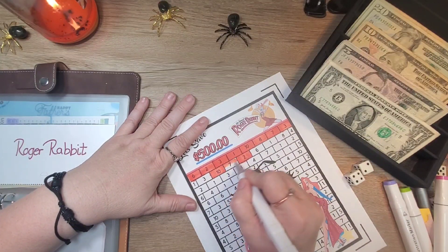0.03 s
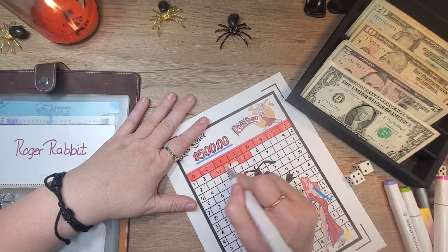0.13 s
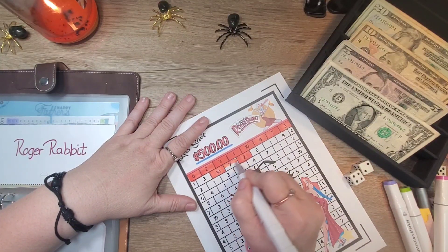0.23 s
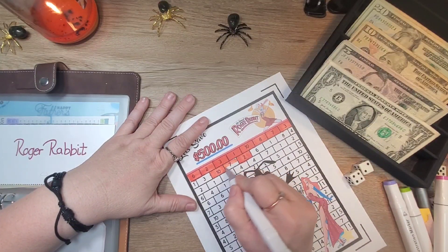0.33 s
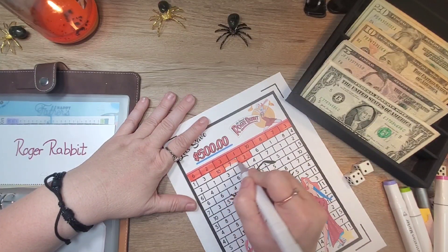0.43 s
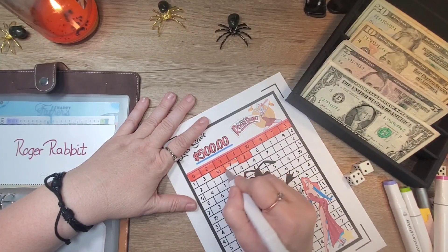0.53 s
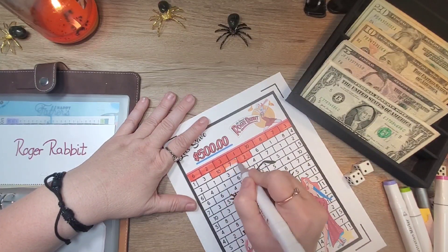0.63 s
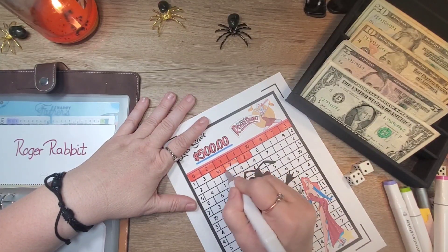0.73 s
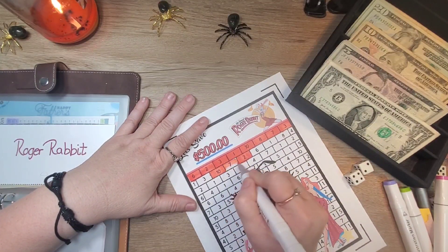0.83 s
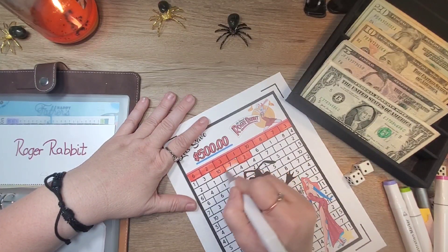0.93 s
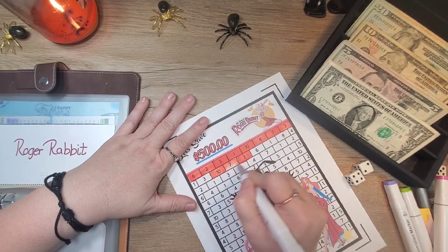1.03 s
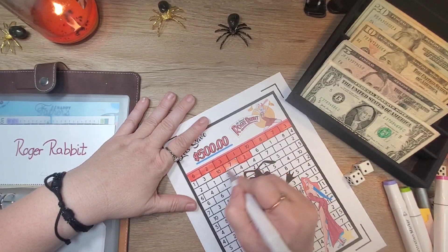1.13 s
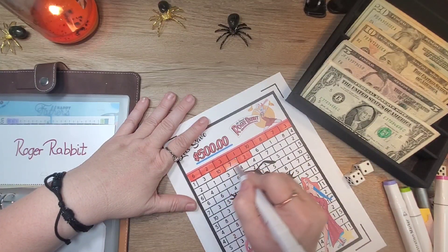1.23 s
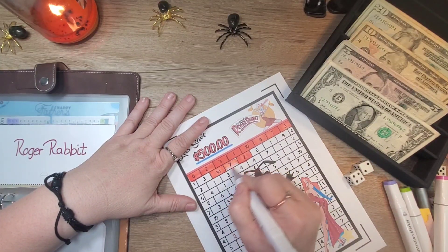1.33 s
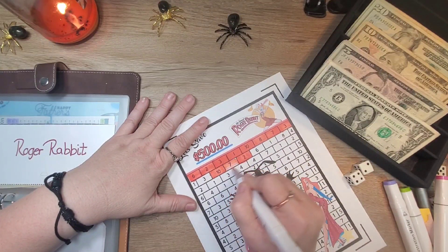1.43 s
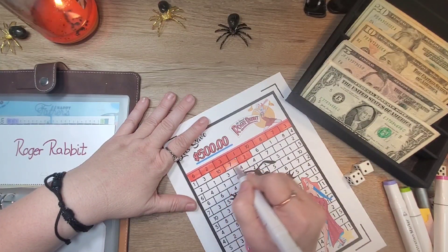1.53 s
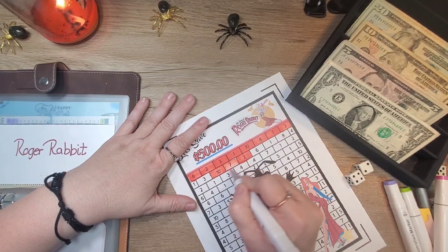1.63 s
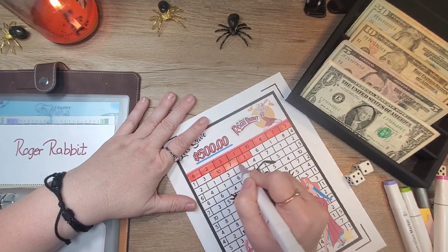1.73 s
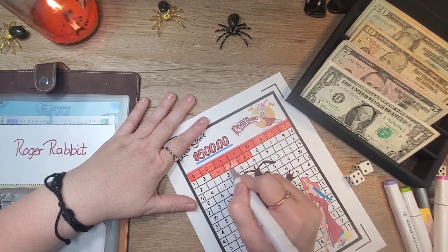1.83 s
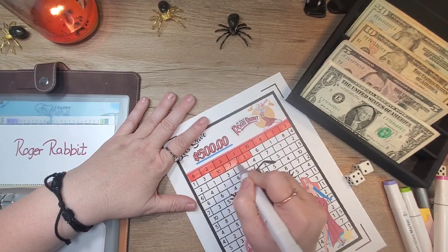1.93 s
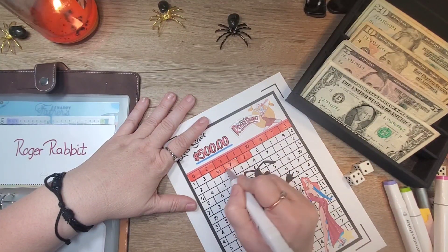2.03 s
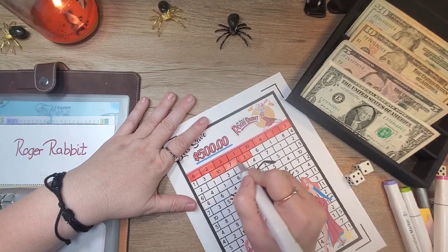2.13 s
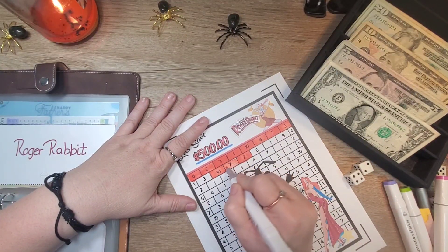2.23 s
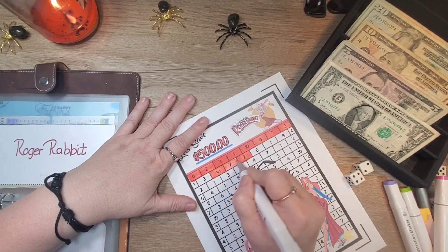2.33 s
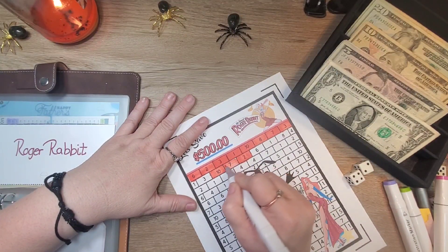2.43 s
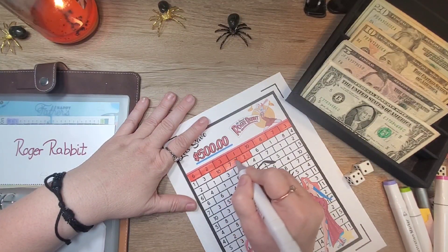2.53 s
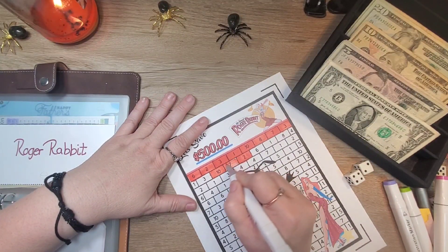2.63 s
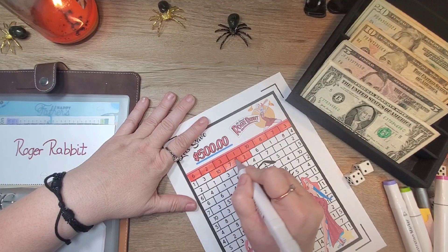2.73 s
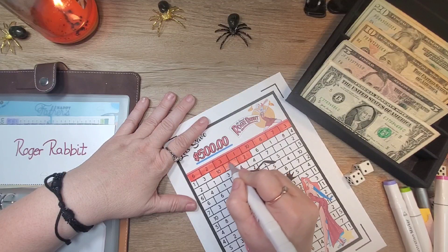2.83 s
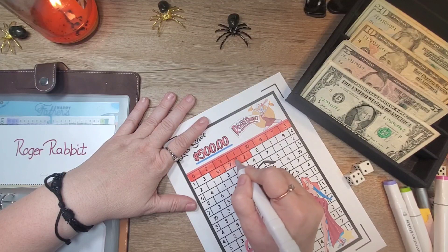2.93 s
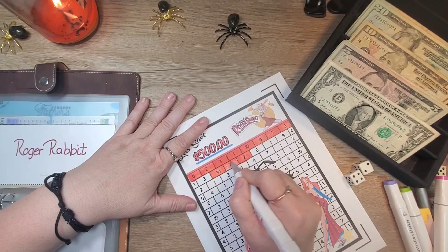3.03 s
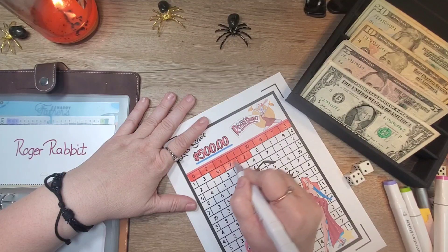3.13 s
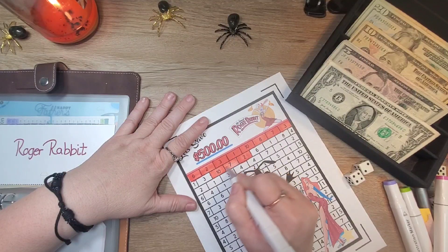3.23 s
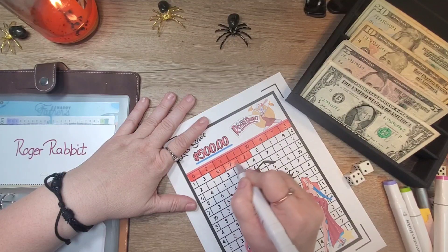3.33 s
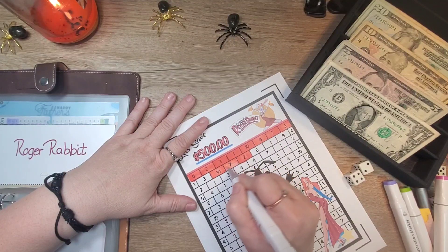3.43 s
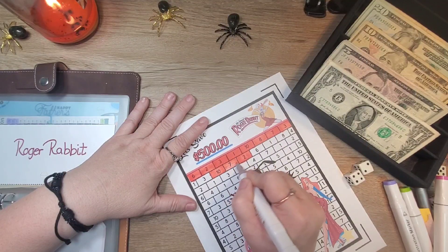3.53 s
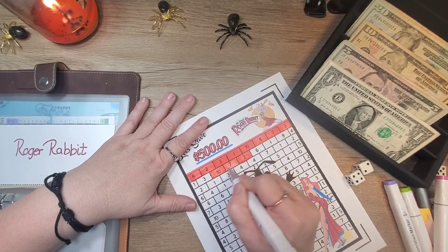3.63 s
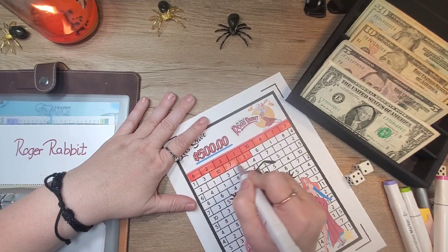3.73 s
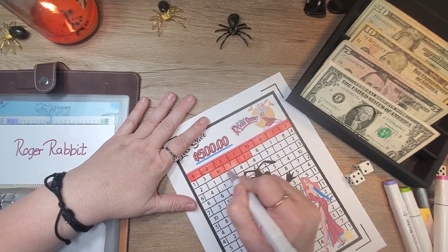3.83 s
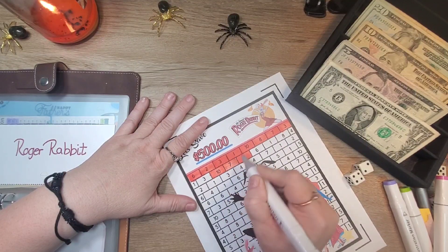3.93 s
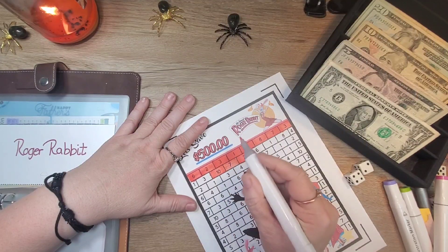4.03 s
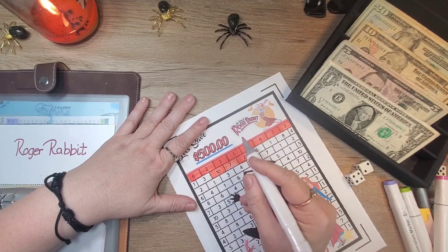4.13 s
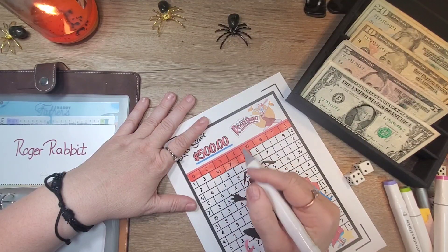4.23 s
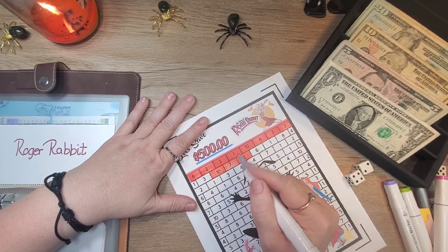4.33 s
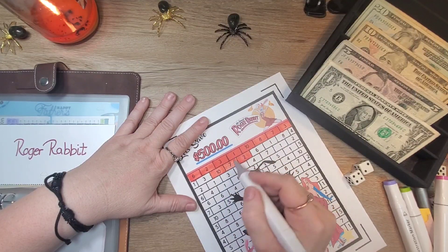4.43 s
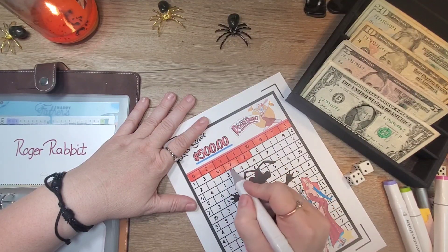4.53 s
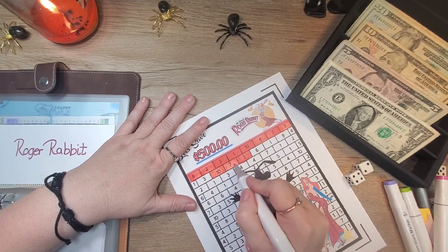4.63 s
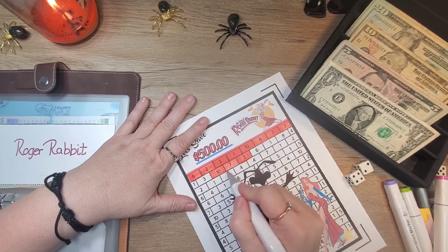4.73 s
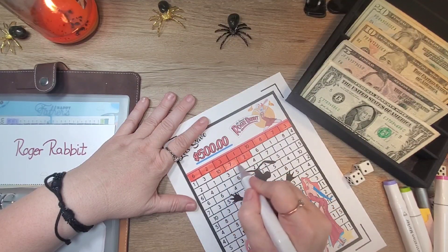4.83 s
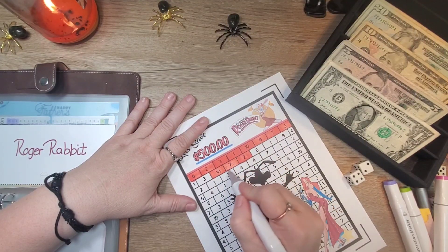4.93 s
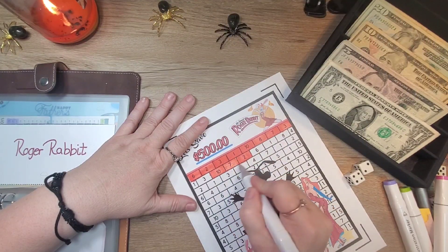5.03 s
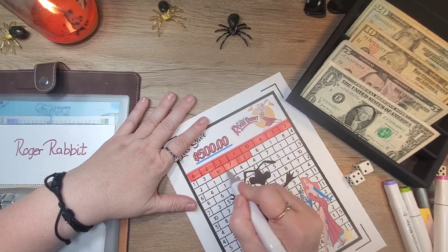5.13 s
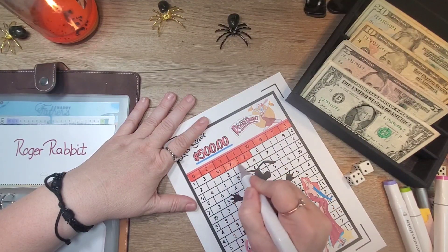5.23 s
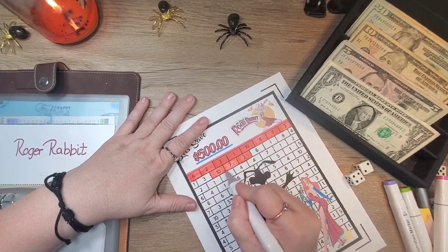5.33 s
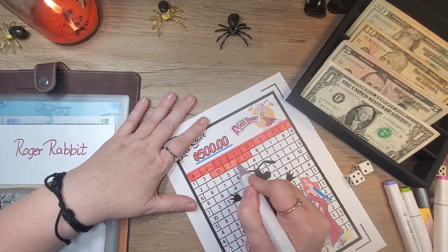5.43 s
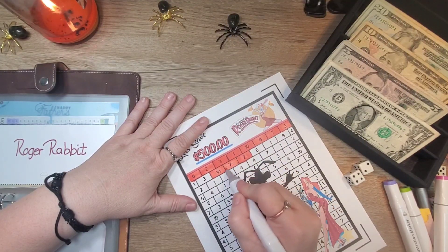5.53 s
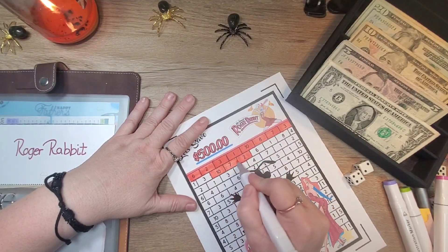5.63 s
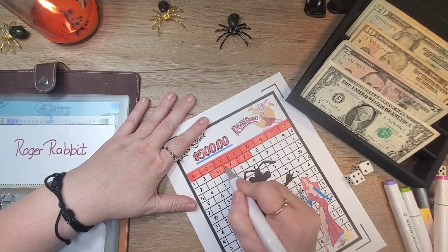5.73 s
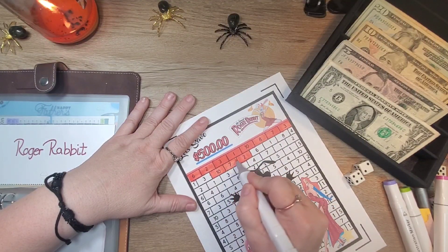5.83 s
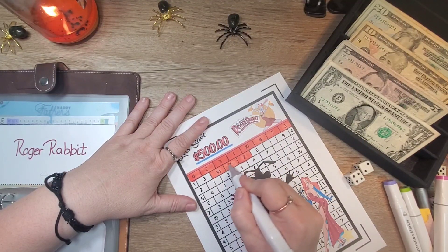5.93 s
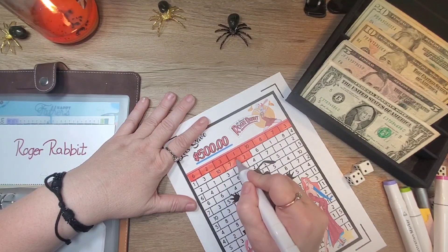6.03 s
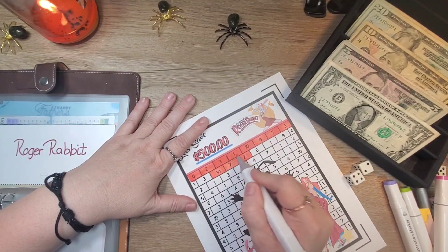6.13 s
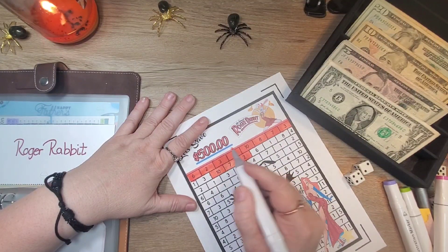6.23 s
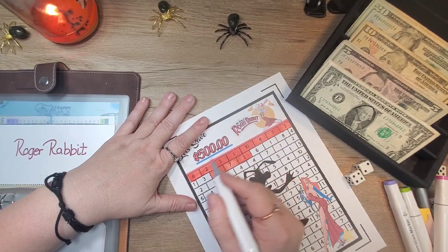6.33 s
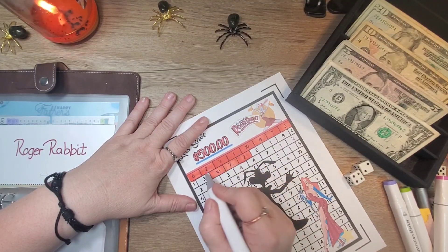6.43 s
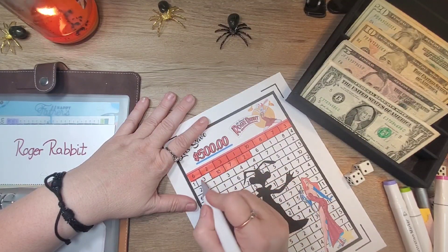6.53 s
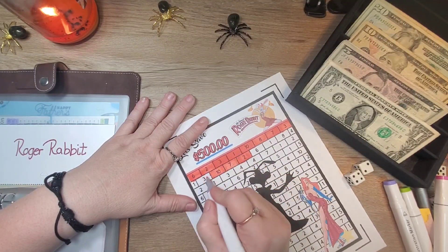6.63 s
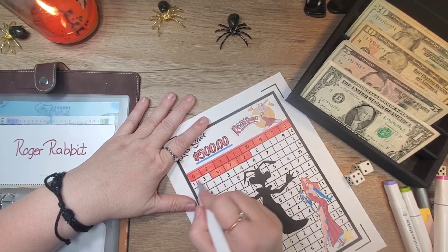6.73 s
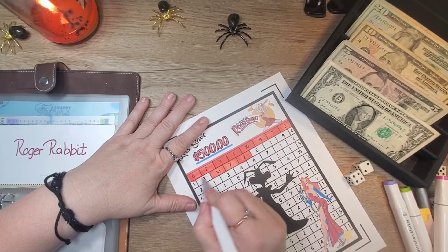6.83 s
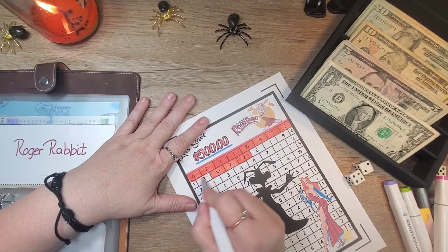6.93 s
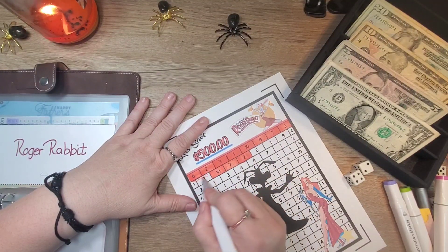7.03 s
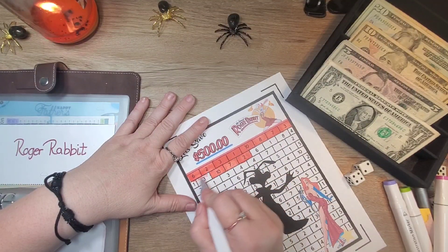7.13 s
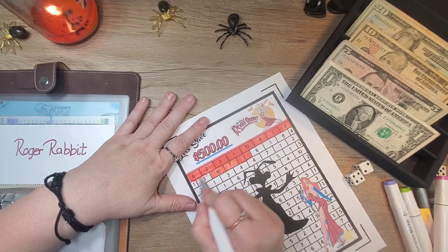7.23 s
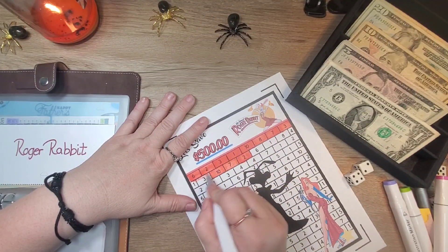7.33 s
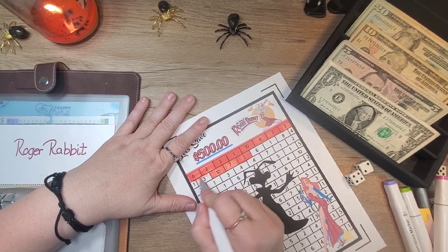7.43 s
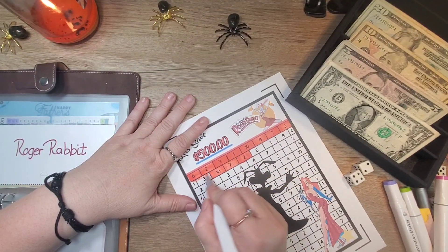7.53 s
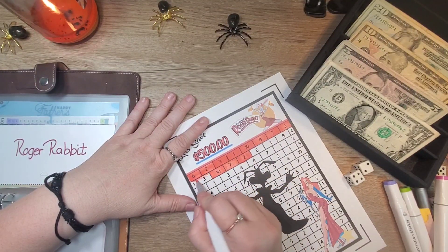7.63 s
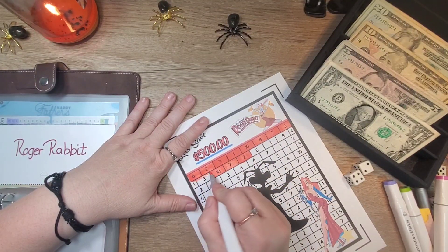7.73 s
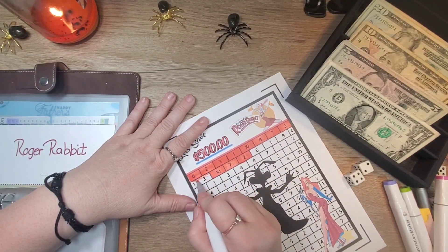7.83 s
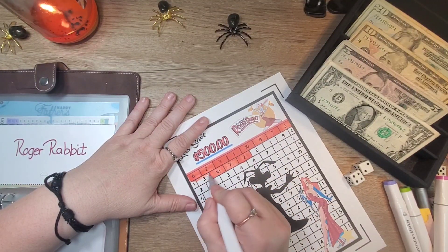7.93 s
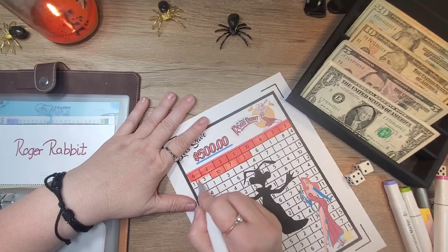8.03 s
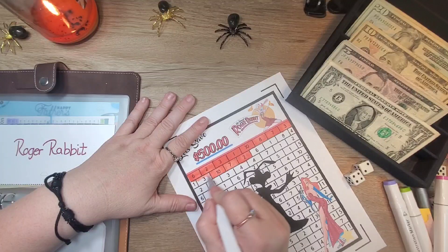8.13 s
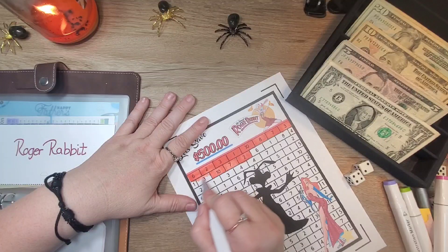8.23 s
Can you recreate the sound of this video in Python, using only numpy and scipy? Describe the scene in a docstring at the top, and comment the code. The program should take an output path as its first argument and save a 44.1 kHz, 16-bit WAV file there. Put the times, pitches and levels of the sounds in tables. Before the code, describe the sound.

Close, dry marker colouring on paper over a wooden desk. About ten short raspy strokes a second, each with a thin high squeak and frequent little ticks. The squeak grows stronger before a pause near four seconds, where skin softly brushes the sheet and a faint whine sags. A second, shorter burst follows, another brief pause, then a third, scratchier burst. A quiet room hums underneath.

```python
"""A felt marker fills a first square on paper over a wooden desk, some ten rasping, squeaking strokes a second.
Each stroke runs noise through a felt colour and sounds a stick-slip tone whose pitch follows the nib's speed.
Hard landings tick; late in this square the grip firms and the squeak swells. Then the hand brushes the sheet
in soft noise, under a faint sagging whine. A second square, another brush and a third square follow.
Shaped noise and two wavering low tones make a quiet, humming room throughout."""
import sys
import numpy as np
from scipy import signal
from scipy.fft import rfft, irfft
from scipy.io import wavfile
from scipy.ndimage import uniform_filter1d

SR = 44100
rng = np.random.default_rng(int(sys.argv[2]) if len(sys.argv) > 2 else 0)


def store_pcm(level_fs):
    """Save levels as 16-bit WAV."""
    pcm = np.round(np.clip(level_fs, -1, 1) * 32767).astype(np.int16)
    wavfile.write(sys.argv[1], SR, np.atleast_2d(pcm).T)


N = 364707
TIME = np.arange(N) / SR  # s

# Levels of the pen and hand are relative: each source and the desk add their own trim.
# Room noise spectrum: pitch_hz, density_db [dB per Hz, relative]
ROOM_SPECTRUM = [(20, -19), (45, -1), (56, 3.5), (90, -10.5), (130, -4.5), (300, -8.5), (450, -13),
                 (630, -7.5), (800, -23), (1100, -15), (2000, -21.5), (6000, -36.5), (15000, -43.5)]
# Left-right likeness of the room noise: pitch_hz, likeness [-1 opposed to 1 identical]
EAR_LIKENESS = [(30, 0.96), (120, 0.91), (250, 0.74), (500, -0.058), (1200, -0.69), (15000, -0.11)]
# Low hum: pitch_hz, level_db
HUM_TONES = [(58.5, -67), (120.5, -65.5)]
# Colour of the pen and hand at each ear: pitch_hz, gain_db
LEFT_EAR = [(1000, 3.5), (2300, 3), (4000, -0.5), (5000, 2.5), (6100, 3.0), (7000, -3.0),
            (8300, 2.0), (10500, 5.0), (15000, -4.0)]
RIGHT_EAR = [(1000, 2.5), (2300, 2.5), (4000, 4.5), (5000, -5.0), (6100, 1.0), (7000, -6.5),
             (8300, -2.5), (10500, 2.5), (15000, -3.5)]
# Partials of the whine: multiple [of its base pitch], level_db
WHINE_OVERTONES = [(2, 0), (3, -9), (4, -7), (6, -10)]
# Hand over the sheet: start_s, loudest_s, end_s, level_db; a row ending before it starts stays silent
HAND_SLIDES = [(4.0, 4.037, 4.18, -63), (4.117, 4.22, 4.3, -69.5), (4.47, 4.56, 4.65, -65),
               (6.14, 6.227, 5.8, -65), (6.216, 6.45, 6.5, -63.5)]
# Skin on paper: pitch_hz, density_db [dB per Hz, relative]
SKIN_SPECTRUM = [(710, -43), (1200, -1), (1360, -5), (1610, -19.5), (2010, -11.5), (2790, -3.5), (4640, 1),
                 (15000, -11.5)]
# Landings of the nib: start_s, level_db
NIB_LANDINGS = [(0.1514, -19.5), (0.3557, -17.5), (0.5731, -15), (0.7868, -19), (0.9981, -17), (1.207, -19),
                (1.4217, -17.5), (1.6414, -16), (2.0612, -20.5), (2.2704, -19.5), (2.8741, -15),
                (3.0663, -20), (3.455, -15), (3.6582, -14), (3.8574, -15), (4.2113, -51.5), (4.7418, -37),
                (5.004, -29.5), (5.1996, -28), (5.976, -18), (6.1818, -44), (6.7705, -48.5), (7.449, -21.5),
                (7.877, -22.5), (8.099, -20.5)]
# Bright landing of the nib: pitch_hz, density_db [dB per Hz, relative]
LANDING_SPECTRUM = [(400, -39.5), (1050, -19), (1500, -26.5), (2400, -1), (3600, 4), (5000, 3), (8300, 4),
                    (10000, -7.5), (15000, 1.5)]
# Dull knock of sheet on desk: pitch_hz, density_db [dB per Hz, relative]
KNOCK_SPECTRUM = [(650, -32.5), (1100, 7), (1500, -18.5), (1900, 7), (2400, 14.0), (4500, -17), (12000, -30.0)]
# Pen strokes: start_s, end_s, rasp_db, squeak_db, growth_db [of the squeak from start to end]
PEN_STROKES = [(-0.04, 0.023, -35.5, -38.5, -2), (0.044, 0.126, -33, -29, -12),
               (0.151, 0.224, -33.5, -32, -14), (0.253, 0.328, -35, -27.5, -12.5),
               (0.354, 0.433, -33.5, -30, -10), (0.459, 0.547, -34, -28.5, -13),
               (0.571, 0.649, -31, -33.0, -8), (0.674, 0.759, -34.5, -27.5, -14),
               (0.786, 0.866, -35, -33, -12), (0.888, 0.972, -33.5, -27.5, -9.5),
               (0.998, 1.074, -35, -31.5, -7), (1.097, 1.18, -34.5, -26.5, -23),
               (1.207, 1.283, -35, -32.5, -14), (1.31, 1.4, -33.5, -31.5, -6),
               (1.419, 1.504, -35, -33.5, -15), (1.522, 1.616, -36.5, -30, -15),
               (1.638, 1.717, -33.5, -31, -11), (1.741, 1.832, -35.5, -28.5, -15),
               (1.861, 1.934, -38.5, -34, -26), (1.955, 2.042, -38.5, -32.5, -1.5),
               (2.059, 2.14, -37, -32.5, -22), (2.159, 2.251, -37.5, -28.5, -3.5),
               (2.266, 2.343, -37.0, -35, -16), (2.366, 2.448, -37.5, -30, -13),
               (2.471, 2.547, -35.5, -32.5, -15), (2.569, 2.653, -34, -29, 3),
               (2.673, 2.745, -33, -33, -14), (2.769, 2.846, -30.5, -25.0, 1),
               (2.873, 2.934, -31, -25, -12), (2.965, 3.036, -29.5, -29, -11),
               (3.064, 3.116, -37.5, -34.5, 1), (3.151, 3.218, -42.5, -38.5, -7),
               (3.241, 3.324, -35.0, -39.5, 0), (3.347, 3.427, -33.5, -29.5, 9),
               (3.453, 3.522, -34, -26.5, -14), (3.551, 3.62, -31.5, -21.0, -7), (3.66, 3.72, -29, -23, -5),
               (3.754, 3.826, -35, -28.5, -5), (3.856, 3.923, -28, -21.5, -1),
               (3.951, 3.982, -33, -26.5, -28), (4.795, 4.867, -40.5, -47, 11),
               (4.893, 4.972, -37, -32.5, 7.5), (5.002, 5.069, -35.5, -35, -4),
               (5.094, 5.174, -35, -35, -1), (5.197, 5.267, -32, -32.5, -6), (5.295, 5.369, -35, -33, -6),
               (5.389, 5.467, -33.5, -30.5, -14), (5.49, 5.566, -34.5, -32, -9),
               (5.589, 5.659, -35, -31, -15), (5.685, 5.755, -35, -31.5, -9), (5.781, 5.851, -31, -30, -12),
               (5.877, 5.948, -34, -33.0, -6), (5.973, 6.036, -30.5, -31.5, 2),
               (6.064, 6.129, -33.5, -32, -10), (6.793, 6.896, -41.5, -48, 2),
               (6.919, 7.006, -36.5, -41.5, 9), (7.023, 7.096, -35.5, -42, -14),
               (7.128, 7.205, -40, -32.5, -1), (7.223, 7.302, -35.5, -46.0, -22),
               (7.338, 7.428, -34.5, -33.0, 11), (7.446, 7.51, -35.0, -42, -11),
               (7.551, 7.629, -37, -35.5, -1), (7.649, 7.726, -35, -44, -13),
               (7.766, 7.858, -33.5, -32.5, -3), (7.872, 7.952, -35, -45.5, -17),
               (7.99, 8.075, -33, -32, 6), (8.097, 8.167, -34.5, -47, -12), (8.201, 8.31, -32, -23, -3)]
# Squares: start_s, entry_speed [share of full speed], loss_db [most squeak lost off the nib's resonance]
SQUARE_SETTINGS = [(-1, .75, 12), (5, 0.89, 2), (6.5, 0.97, 3.5)]
# Firmness of the nib on the paper: time_s, grip [0-1]
NIB_GRIP = [(0, .2), (2.7, .22), (2.81, .8), (3.0, 0.99), (3.18, .1), (3.3, .1), (3.58, .88), (3.79, .7),
            (3.95, .9), (4.7, .04), (8.13, 0.08), (8.25, .75)]
# Felt rasping over paper: pitch_hz, density_db [dB per Hz, relative]
FELT_SPECTRUM = [(500, -33), (1100, -18), (1550, -31), (1900, -13.5), (2350, -6.5), (3400, -2.5), (4400, 1),
                 (5200, 2.5), (6200, 3.5), (7300, 9), (8500, 0), (9700, -9.5), (11800, -2.5), (15000, -14)]
# Coarse drag of the slow nib: pitch_hz, density_db [dB per Hz, relative]
DRAG_SPECTRUM = [(500, -30), (1500, -16), (2800, 0), (4500, -6), (14000, -16)]
# Ringing of the pen body: pitch_hz, gain_db [relative]
BODY_RESONANCE = [(800, -28.5), (2400, -6), (3600, -6), (4400, -18), (5000, -0.5), (5450, -14),
                  (6500, -5.5), (8600, -7.5), (10000, -11), (15000, -9)]
# Shading of the nib by the hand, square by square: pitch_hz, gain_db
HAND_SHADES = [[(2000, -4), (2900, -5.5), (3350, -9), (4000, -2.5), (4800, -2), (6000, -2), (7800, -0.5),
                (9500, -8), (13000, -3.5)], [(1500, -2.5), (2250, -6), (3000, -1.5), (3600, -10), (4200, 0),
                                     (4800, 0.5), (6000, -2.5), (7900, 2.5), (9500, -9), (13000, -2.5)], [(1900, -2.5), (2750, -6), (3300, -12.5),
                                                           (3750, -12), (4400, -16), (4900, -2),
                                                           (6000, -2.5), (7900, 3), (9500, -6.5),
                                                           (13000, -1.5)]]

# A stroke peaks at a share of its length; turn speed is a share of full speed
FASTEST_AT, TURN_SPEED, BRAKING_POWER = .38, .31, 3.0
# A nib landing with a tap is caught: its share of full speed, and the time to spring free
CAUGHT_SPEED, SPRING_S = .46, .011
# Slip rate at full speed with no grip, its fall per unit of grip, and how far grip flattens the glide
SLIP_HZ, GRIP_FALL_HZ, LOCKING = 6063, 1229, .4
# The squeak is loudest at the nib's resonance; with a firm grip it swells mid-stroke
NIB_HZ, NIB_WIDTH_HZ, SWELL = 4610, 990, .8
# Contact builds and fades over shares of a stroke; the rasp eases along it
PRESS, RELEASE, RASP_EASING_DB = .13, .21, 3.5
WHINE_START_S, WHINE_END_S, WHINE_ATTACK_S, WHINE_RELEASE_S = 4.11, 4.56, .04, .14
WHINE_HZ, WHINE_SAG_HZ_PER_S = 500, 25
WHINE_DB = -71  # level of a partial listed at 0 dB


def from_db(db):
    """Decibels to gain."""
    return 10 ** (np.asarray(db) / 20)


def rms_one(x):
    """Scale to unit power."""
    return x / np.sqrt(np.mean(x ** 2) + 1e-20)


def at_hz(points, hz):
    """Read a table on a log-frequency axis."""
    known_hz, values = np.transpose(points)
    return np.interp(np.log(np.maximum(hz, 1)), np.log(np.maximum(known_hz, 1)), values)


def colour(x, spectrum, size=2048):
    """Causal, minimum-phase filter with the given spectrum, built by folding its cepstrum."""
    gain = from_db(at_hz(spectrum, np.fft.rfftfreq(size, 1 / SR)))
    cepstrum = irfft(np.log(gain))
    cepstrum[1:size // 2] *= 2
    cepstrum[size // 2 + 1:] = 0
    response = irfft(np.exp(rfft(cepstrum)))
    return signal.oaconvolve(np.atleast_2d(x), response[None], axes=1)[:, :N]


def drift(rate_hz):
    """Smooth random wander with spread 1."""
    r = np.exp(-2 * np.pi * rate_hz / SR)
    wander = signal.lfilter([1], [1, -2 * r, r * r], rng.standard_normal(N + SR))
    return rms_one(wander[SR:])  # the first second lets the filter settle


def smooth(x, seconds):
    """Running mean over a short time."""
    return uniform_filter1d(x, max(1, int(seconds * SR)))


def room_noise(air_db=-55.0, hum_waver_db=0.5):
    """Low rumble, alike in both ears in the bass and partly opposed above, with a wavering mains hum."""
    hz = np.fft.rfftfreq(N, 1 / SR)
    alike = np.clip(at_hz(EAR_LIKENESS, hz), -1, 1)
    mid, side = rfft(rng.standard_normal((2, N))) * from_db(at_hz(ROOM_SPECTRUM, hz))
    air = irfft(np.sqrt(1 + alike) * mid + np.sqrt(1 - alike) * side * [[1], [-1]], N)
    hum = np.zeros(N)
    for pitch_hz, level_db in HUM_TONES:
        gain = from_db(level_db + hum_waver_db * drift(4.5))
        hum += gain * np.sqrt(2) * np.sin(2 * np.pi * pitch_hz * TIME + 0.46 * drift(1.8))
    return from_db(air_db) * rms_one(air) + hum


def echoes(x, first_s, t60):
    """Dense reflections die away exponentially, unrelated in the two ears; unit-energy response."""
    age = TIME[:SR // 2] - first_s
    decay = from_db(-60 * np.clip(age / t60, 0, 3))
    response = rng.standard_normal((2, len(age))) * (age > 0) * decay
    response /= np.sqrt(np.sum(response ** 2, axis=1, keepdims=True))
    return signal.oaconvolve(np.broadcast_to(x, (2, N)), response, axes=1)[:, :N]


def over_desk(x, near_db=0.5, desk_db=-2, room_db=-9.5):
    """Direct sound, one sample earlier on the left, scatters off hand and desk, then off the room."""
    left = colour(x[0], LEFT_EAR)
    right = colour(np.roll(x[1], 1), RIGHT_EAR)
    direct = np.vstack([left, right])
    desk = from_db(desk_db) * echoes(direct, first_s=.0003, t60=.014)
    room = from_db(room_db) * echoes(direct, first_s=.0048, t60=.18)
    return from_db(near_db) * (direct + desk) + room


def whine(waver=0.0074):
    """A faint tone of overtones on a wavering, slightly falling base pitch."""
    age = TIME - WHINE_START_S
    pitch = (WHINE_HZ - WHINE_SAG_HZ_PER_S * age) * (1 + waver * drift(40))
    phase = 2 * np.pi * np.cumsum(pitch) / SR
    tone = sum(from_db(level_db) * np.sin(k * phase) for k, level_db in WHINE_OVERTONES)
    attack = np.clip(age / WHINE_ATTACK_S, 0, 1)
    release = np.clip((WHINE_END_S - TIME) / WHINE_RELEASE_S, 0, 1)
    return from_db(WHINE_DB) * attack * release * np.sqrt(2) * tone


def hand_slides(slide_db=0.5):
    """Skin brushes over the sheet as coloured friction noise, swelling and fading."""
    gain = np.zeros(N)
    for start, loudest, end, level_db in HAND_SLIDES:
        gain += np.interp(TIME, [start, loudest, end], [0, from_db(level_db), 0])
    return gain * from_db(slide_db) * rms_one(colour(rng.standard_normal(N), SKIN_SPECTRUM))


def fibres(per_s, spread_db, bed):
    """Fibres snap free at random, a few of them hard, over a bed of fine friction."""
    sizes = from_db(spread_db * np.minimum(rng.exponential(1, N), 4)) * rng.choice([-1, 1], N)
    snaps = rms_one(sizes * (rng.random(N) < per_s / SR))
    return rms_one(snaps + bed * rng.standard_normal(N))


def taps(chatter_s=0.0048, decay_s=0.0049, tap_db=-4.0, knock_db=-24.5):
    """The nib lands and chatters for a few milliseconds; the sheet knocks on the desk under it."""
    gain = np.zeros(N)
    for start, level_db in NIB_LANDINGS:
        age = TIME - start
        gain += from_db(level_db) * (age >= 0) * np.exp(-np.clip((age - chatter_s) / decay_s, 0, 30))
    bright = rms_one(colour(fibres(per_s=7400, spread_db=1.5, bed=.9), LANDING_SPECTRUM))
    dull = rms_one(colour(rng.standard_normal(N), KNOCK_SPECTRUM))
    return gain * (from_db(tap_db) * bright + from_db(knock_db) * dull)


def square_at(s):
    """Index of the square's settings in force at a time."""
    return np.searchsorted([row[0] for row in SQUARE_SETTINGS[1:]], s)


def stroke_speed(age, share, entry, caught):
    """Nib speed, 0-1: gathers smoothly, or springs up after a hard landing, then brakes to turn."""
    rising = np.clip(share / FASTEST_AT, 0, 1)
    if caught:
        lag = (1 - CAUGHT_SPEED) * np.exp(-age / SPRING_S * (1 + rising))
    else:
        lag = (1 - entry) * np.cos(np.pi / 2 * rising) ** 2
    braking = np.clip((share - FASTEST_AT) / (1 - FASTEST_AT), 0, 1) ** BRAKING_POWER
    return np.clip((1 - lag) * (1 - (1 - TURN_SPEED) * braking), .01, 1)


def hand():
    """The hand's strokes set nib speed and grip, and so rasp gain, squeak gain and slip pitch."""
    speed, rasp, squeak, pitch, grip = np.zeros((5, N))
    for start, end, rasp_db, squeak_db, growth_db in PEN_STROKES:
        span = slice(*np.searchsorted(TIME, [start, end]))
        age = TIME[span] - start
        share = age / (end - start)
        _, entry, loss_db = SQUARE_SETTINGS[square_at(start)]
        caught = any(abs(s - start) < .01 for s, _ in NIB_LANDINGS)
        hold = np.clip(np.interp((start + end) / 2, *np.transpose(NIB_GRIP)), 0, .98)
        grip[span] = hold
        speed[span] = stroke_speed(age, share, entry, caught)
        pitch[span] = (SLIP_HZ - GRIP_FALL_HZ * hold) * speed[span] ** (1 - LOCKING * hold)
        contact = np.clip(share / PRESS, 0, 1) * np.clip((1 - share) / RELEASE, 0, 1)
        rasp_shape = contact ** 0.39 * from_db(-RASP_EASING_DB * share)
        rasp[span] = from_db(rasp_db) * rms_one(rasp_shape)
        detuned = 1 - np.exp(-((pitch[span] - NIB_HZ) / NIB_WIDTH_HZ) ** 2)
        swell = np.abs(np.sin(np.pi * share)) ** (SWELL * hold)
        squeak_shape = contact * swell * from_db(growth_db * share - loss_db * detuned)
        squeak[span] = from_db(squeak_db) * rms_one(squeak_shape)
    return speed, rasp, squeak, pitch, grip


def nib_rasp(gain, speed, rasp_db=-1.5, drag_db=-5.0, tooth_db=1.17, own=0.81):
    """Felt snaps over fibres, dragging coarser and lower as it slows; the ears share part of the grain."""
    shared, left, right = [fibres(per_s=3500, spread_db=2.5, bed=0.66) for _ in range(3)]
    grain = np.sqrt(1 - own) * shared + np.sqrt(own) * np.array([left, right])
    fine = rms_one(colour(grain, FELT_SPECTRUM))
    coarse = rms_one(colour(fibres(per_s=1200, spread_db=2.5, bed=0.4), DRAG_SPECTRUM))
    tooth = from_db(tooth_db * drift(350))  # the uneven surface of the paper
    drag = from_db(drag_db) * 2 * (1 - speed) * coarse
    return gain * tooth * (from_db(rasp_db) * fine + drag)


def nib_squeak(gain, speed, pitch, grip, scatter=0.12, loose_scatter=.14, octave_db=-17.0,
               grip_octave_db=7.5, flutter_db=1.5, squeak_db=0.5):
    """Stick-slip oscillation: steadier with grip, uneven at speed, near a stall or with no grip."""
    stall = np.clip((.7 - speed) / .2, 0, 1)
    unrest = (1 - grip) * (0.145 + speed ** 5) * scatter
    unrest = unrest + loose_scatter * np.exp(-20 * grip) + .16 * stall
    waver = .026 * drift(130) + .018 * grip * drift(30)
    phase = 2 * np.pi * np.cumsum(pitch * (1 + unrest * drift(1500) + waver)) / SR
    # a firmer grip makes sharper slips, with stronger overtones that come and go
    edge = from_db(grip_octave_db * grip + 5.1 * drift(45))
    octave = from_db(octave_db) * np.sin(2 * phase)
    third = from_db(-20) * np.sin(3 * phase)
    slips = np.sin(phase) + edge * (octave + third)
    rung = colour(slips * (pitch > 0), BODY_RESONANCE)[0]
    # level out most of the body's ringing
    even = rung / np.sqrt(np.abs(smooth(rung ** 2, 0.016)) + 0.0069)
    fading = from_db(-4 * stall)  # weaker near a stall
    return gain * even * fading * from_db(squeak_db + flutter_db * drift(160))


def scene():
    """The pen at its three squares, the sliding hand, the whine and the room."""
    speed, rasp_gain, squeak_gain, pitch, grip = hand()
    pen = nib_rasp(rasp_gain, speed) + nib_squeak(squeak_gain, speed, pitch, grip) + taps()
    square = square_at(TIME)
    shaded = sum(colour(pen * (square == k), shade) for k, shade in enumerate(HAND_SHADES))
    return over_desk(shaded + hand_slides()) + whine() + room_noise()


def record(dry):
    """A steep elliptic low-pass cuts the top."""
    # order 10, 0.3 dB ripple, 70 dB stopband, edge at 15600 Hz
    low_pass = signal.ellip(10, .3, 70, 15600, fs=SR, output="sos")
    return signal.sosfilt(low_pass, dry)


dry = scene()
out = record(dry)
store_pcm(out)
```